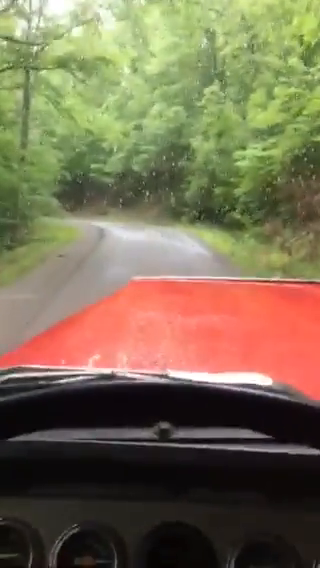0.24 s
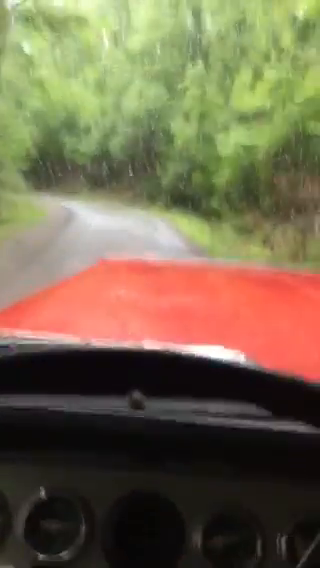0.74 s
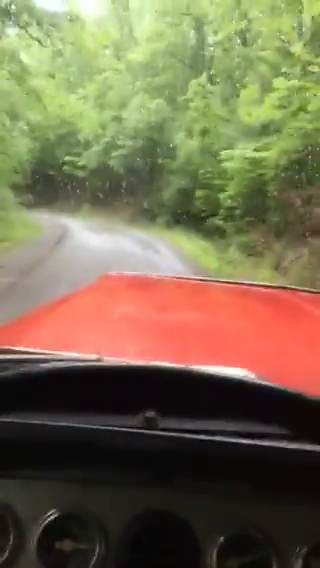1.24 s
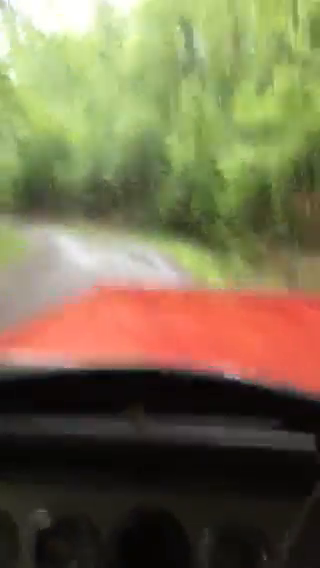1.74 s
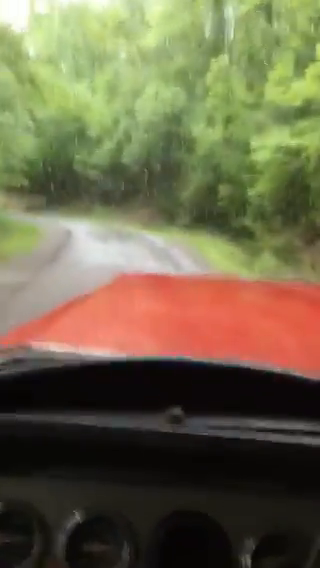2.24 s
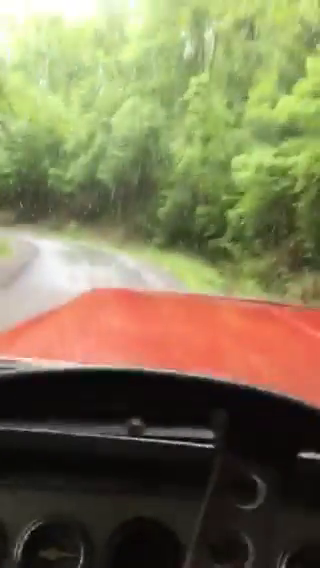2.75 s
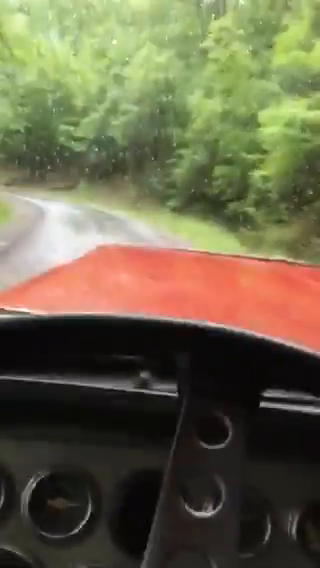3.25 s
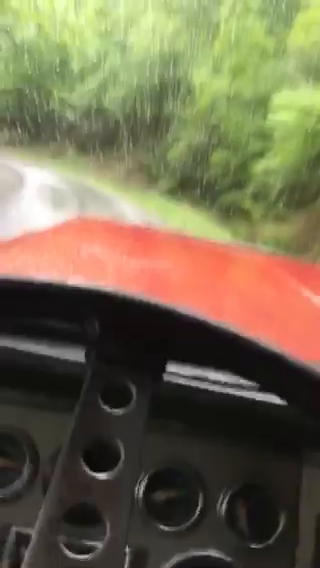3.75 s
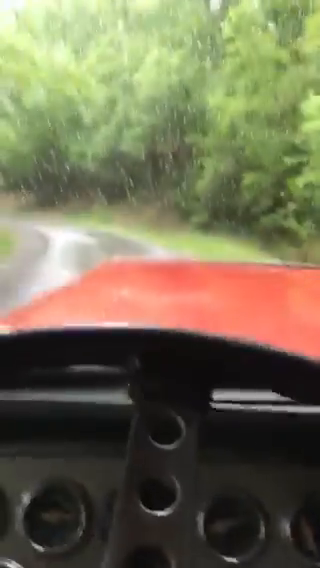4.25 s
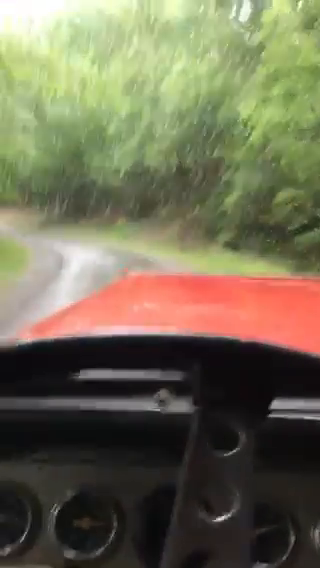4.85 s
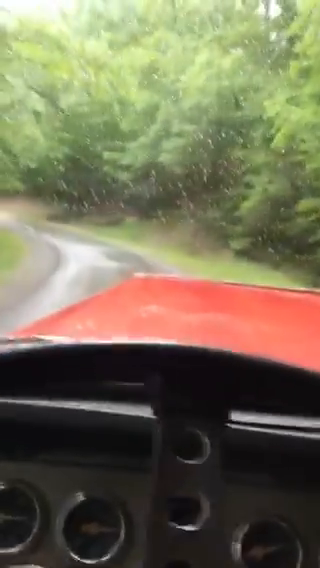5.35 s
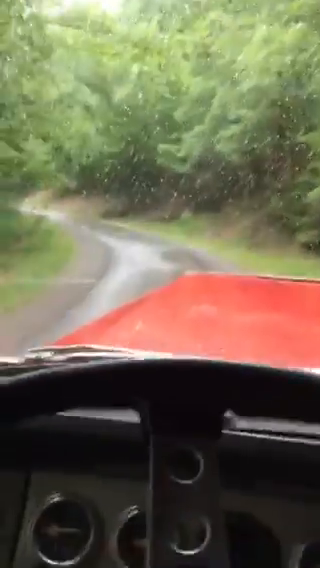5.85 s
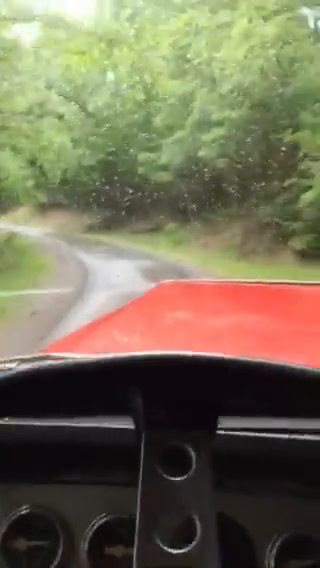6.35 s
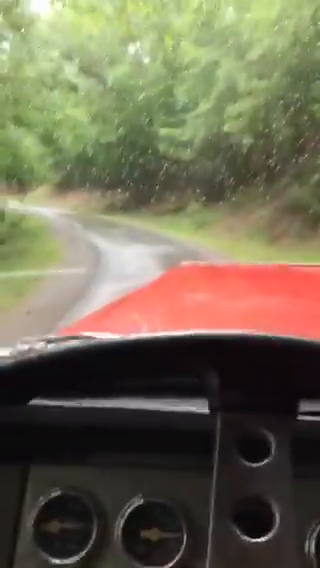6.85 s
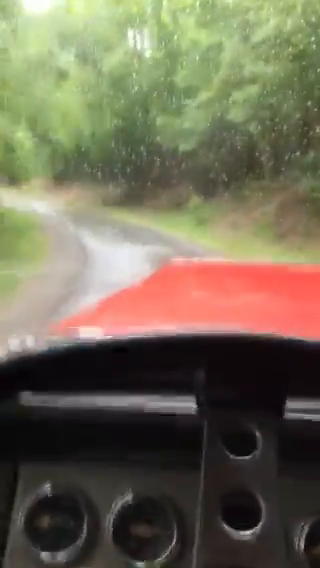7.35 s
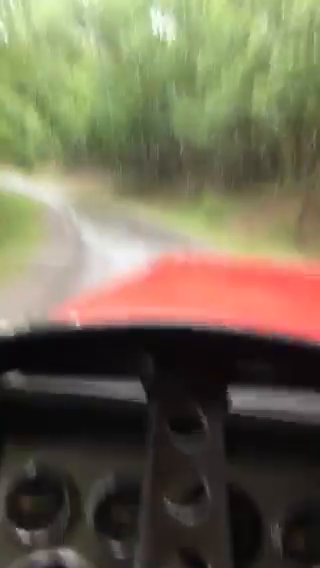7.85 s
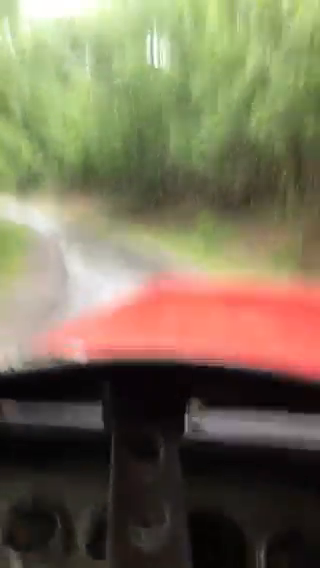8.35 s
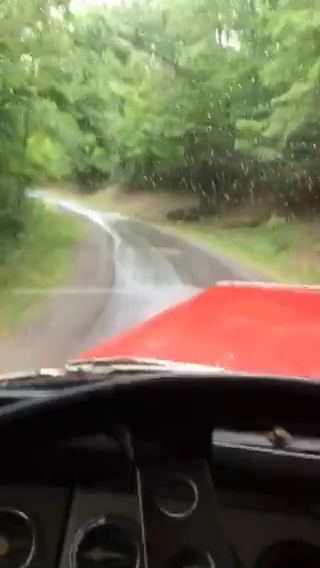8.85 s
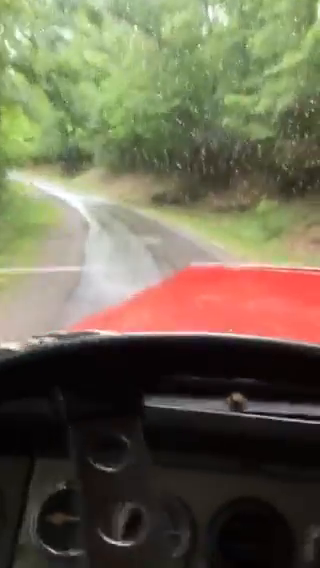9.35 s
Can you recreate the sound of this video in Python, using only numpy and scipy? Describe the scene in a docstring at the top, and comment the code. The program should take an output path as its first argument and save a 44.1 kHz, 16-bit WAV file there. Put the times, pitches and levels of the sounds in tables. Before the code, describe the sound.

A deep, even engine hum fills the cab of an old truck, close to the microphone, with the road rumbling up through the floor. The gears whine softly and creep up in pitch as the dash panels buzz lightly. A brief ringing tone comes and goes early on, and small metallic chinks and ticks appear in two loose clusters. Tyre spray hisses very faintly outside throughout.

```python
"""Cab of an old truck cruising along a wet country road, one microphone at the driver's seat.
Close up, the six-cylinder engine booms at its firing rate and the gears whine at their own shaft speed.
Road rumble comes up through the floor, engine clatter through the panels, tyre spray from outside.
Around the seat, narrow buzzes swell, a cab resonance rings briefly and loose parts chink and tick.
Far back, a turbocharger whistles faintly."""
import sys
import numpy as np
from scipy import signal
from scipy.fft import rfft, irfft
from scipy.io import wavfile

SR = 44100
rng = np.random.default_rng(int(sys.argv[2]) if len(sys.argv) > 2 else 0)


def generate_wav(sig):
    """Save sig (samples, or channels by samples) to the path in sys.argv[1] as 16-bit PCM at SR."""
    pcm = np.round(np.clip(np.atleast_2d(sig).T, -1, 1) * 32767).astype(np.int16)
    wavfile.write(sys.argv[1], SR, pcm)


N = 423360
T = np.arange(N) / SR
FREQ = np.maximum(np.arange(N // 2 + 1) * SR / N, 1)
CYLINDERS = 6


# engine speed as firing rate: t/s, f/Hz
FIRING_RATE = [(0.0, 91.23), (0.5, 92.1), (0.9, 90.81), (1.2, 91.98), (1.4, 90.79), (2.45, 90.67),
               (3.9, 89.33), (4.15, 89.01), (4.5, 89.6), (4.95, 89.12), (5.9, 90.66), (6.25, 90.3),
               (6.55, 91.33), (6.95, 91.87), (7.45, 93.53), (8.4, 93.45), (8.6, 92.5), (9.6, 93.4)]
# cab boom on the firing rate: t/s, level/dB
BOOM_LEVEL = [(0.0, -14.5), (0.4, -16.5), (0.65, -14), (0.95, -16.0), (2.25, -14), (2.5, -16.1),
              (3.3, -15.5), (4.35, -15.1), (5.75, -15.8), (5.9, -15.1), (7.3, -15.5), (7.4, -17.5),
              (7.75, -15), (8.45, -16.5), (8.7, -14.5), (9.6, -16)]
# weaker engine lines: multiple of the two-turn cycle, level/dB
CYCLE_ORDERS = [(2, -52), (3, -39.5), (4, -39), (10, -44.5), (13, -48), (14, -53.5), (18, -53.5), (20, -64),
                (22, -57), (28, -52), (29, -64), (34, -59), (38, -62), (44, -66.5), (56, -67), (64, -63.5),
                (80, -68), (112, -71.5), (288, -81)]
# peaks and dips from engine to microphone: f/Hz, width/Hz, lift/dB
ENGINE_TO_SEAT = [(183.36, 4, -19), (1450, 11, 7.5), (1501, 21, 8)]
# belt-driven accessories: level/dB, roughness/0-1, then their bracket's f/Hz, width/Hz, lift/dB
BELT_ACCESSORIES = [(-65, .12, 848, 25, 16.5), (-62, 0.2, 837, 12, 10)]

def engine(firing, firing_hz):
    """Just ahead of the seat: firings boom in the cab; unequal cylinders add multiples of the cycle."""
    def at_seat(ratio, db, path, rough, rate):
        return undb(db + lift_db(ratio * firing_hz, path)) * tone(ratio * firing, rough, rate)

    out = undb(curve(BOOM_LEVEL)) * tone(firing, rough=0.013, rate=10)
    out += at_seat(ratio=2, db=-36, path=ENGINE_TO_SEAT, rough=0.24, rate=7.5)
    for multiple, db in CYCLE_ORDERS:
        phase = multiple * firing / CYLINDERS + rng.uniform(0, 2 * np.pi)
        out += undb(db) * tone(phase, rough=0.19, rate=2.4)
    out += at_seat(ratio=16, db=-65, path=ENGINE_TO_SEAT, rough=0.42, rate=22)  # a pump or gear
    pulley_ratios = (9.52, 9.12)  # to the firing rate
    for ratio, (db, rough, *bracket) in zip(pulley_ratios, BELT_ACCESSORIES):
        out += at_seat(ratio, db, [bracket], rough, rate=5.5)
    return out


# driveline speed as tooth mesh rate: t/s, f/Hz
MESH_RATE = [(0.0, 221.7), (1.0, 221.6), (1.85, 229.2), (2.8, 236), (5.35, 239.2), (5.9, 240.7),
             (6.15, 241.9), (7.05, 246.2), (7.45, 248.9), (8.45, 249.4), (8.7, 247.6), (9.05, 248.9),
             (9.6, 249)]
# whine from the load on the teeth: t/s, lift/dB
TOOTH_LOAD = [(0, -0.5), (1.45, 1), (2.0, -1.5), (3, 1.5), (3.9, -1), (5.8, 0.5), (8.2, 0.5), (9.3, -2)]
# mesh harmonics, first to fourth: level/dB, roughness/0-1
WHINE_HARMONICS = [(-52, .2), (-47.5, .3), (-48, 0.25), (-56, 0.6)]
# peaks and dips from gearbox to microphone: f/Hz, width/Hz, lift/dB
GEARBOX_TO_SEAT = [(221, 3.6, 5), (250.4, 5.1, 11), (460, 24, -8.5), (496, 26, 3.5), (689.5, 15, -13),
                   (711, 18, 2.5), (734.5, 9, -12.5), (893, 25, 5.5), (922, 16, -9), (975, 10, -7)]

def gears():
    """Meshing teeth whine, swelling with the load and gliding across the cab's peaks and dips."""
    mesh_hz, load_db = curve(MESH_RATE), curve(TOOTH_LOAD)
    mesh = turns(mesh_hz)
    out = np.zeros(N)
    for k, (db, rough) in enumerate(WHINE_HARMONICS, 1):
        path_db = lift_db(k * mesh_hz, GEARBOX_TO_SEAT)
        out += undb(db + load_db + path_db) * tone(k * mesh, rough, rate=6)
    return out


# roughness of the road, as rumble in the 120-170 Hz band: t/s, level/dB
RUMBLE_LEVEL = [(0, -37), (.9, -40.5), (2.1, -39), (2.6, -41), (3.4, -39.5), (5.8, -39), (6.3, -41),
                (7.4, -38.5), (7.9, -41), (9.6, -40.5)]
# rumble spectrum at the seat: f/Hz, relative level/dB
RUMBLE_SPECTRUM = [(20, -74), (28, -58), (38, -51.5), (55, -53), (70, -48.5), (120, -48.5), (155, -53),
                   (200, -57.5), (250, -65.5), (310, -69), (380, -71), (600, -100), (2000, -160)]

def road_rumble():
    """Tyres and chassis shake the cab floor below the microphone."""
    shaking = rng.standard_normal(N) * undb(0.8 * walk(11))
    return undb(curve(RUMBLE_LEVEL)) * band_unit(colour(shaking, RUMBLE_SPECTRUM), 120, 170)


# clatter in the 1-4 kHz band: t/s, level/dB
CLATTER_LEVEL = [(0.0, -48), (1.0, -49), (1.15, -47.5), (2.5, -50), (3.15, -49), (4.9, -49), (6.5, -48),
                 (7.5, -47), (9.6, -47.5)]
# hardness of the combustion, heard in the treble: t/s, lift/dB
COMBUSTION_HARDNESS = [(0, 2), (1.2, 1.3), (2.2, 0.5), (5, -1), (8, 0.5), (9.6, -.5)]
# clatter spectrum at the seat: f/Hz, relative level/dB
CLATTER_SPECTRUM = [(300, -102), (380, -80), (470, -68), (600, -75), (780, -71.5), (930, -75), (1080, -79),
                    (1600, -79.5), (2450, -85.5), (2900, -90), (3500, -92), (4400, -99), (4900, -104),
                    (6500, -125)]
# firewall and dash resonances: f/Hz, width/Hz, lift/dB
FIREWALL_MODES = [(410, 30, 0), (966, 22, 5), (1224, 39, 2.5), (1310, 40, 5.5), (1458, 59, 5),
                  (1683, 36, 6), (2200, 70, 2.5), (2450, 110, 3.5), (4370, 130, 1.5)]

def clatter(firing):
    """Combustion and valve noise from behind the firewall, pulsing with each firing and each cycle."""
    pulsing = 1 + 0.046 * np.cos(firing) + 0.077 * np.cos(firing / CYLINDERS)
    combustion = rng.standard_normal(N) * pulsing * undb(0.5 * walk(9.9))
    treble = colour(combustion, [(1800, -40), (2500, -0.5)])
    combustion += (undb(curve(COMBUSTION_HARDNESS)) - 1) * treble
    in_cab = colour(combustion, CLATTER_SPECTRUM, FIREWALL_MODES)
    return undb(curve(CLATTER_LEVEL)) * band_unit(in_cab, 1000, 4000)


# narrow buzzes: f/Hz, width/Hz, resting level/dB, firing rate where loudest/Hz, span/Hz, lift/dB
BUZZ_BANDS = [(1720, 60, -71, 93.4, 1.5, 13), (2040, 41, -63.5, 91.4, 1.2, 5.5),
              (3250, 61, -75, 89.4, 3.3, 8.5)]

def buzzes(firing_hz):
    """A buzzing whine near 1720 Hz swells as the truck speeds up.
    Above it, two dash panels at arm's length each buzz most near one engine speed."""
    return sum(undb(db + lift_db(firing_hz, [swell])) * airy(2 * np.pi * hz * T, width)
               for hz, width, db, *swell in BUZZ_BANDS)


# brief swells of a whine in the cab: t/s, length/s, level/dB
WHINE_SWELLS = [(.26, 0.11, -52), (.55, 0.15, -52), (1.056, .35, -49), (1.75, 0.099, -53),
                (8.73, 0.12, -53)]

def cab_resonance(pitch_hz=1480, edge_s=0.033):
    """Around the microphone, a cab resonance rings with the engine: quick rise, hold, quick fall."""
    envelope = sum(undb(db) * np.clip(np.minimum(T - start, start + length - T) / edge_s, 0, 1)
                   for start, length, db in WHINE_SWELLS)
    return envelope * tone(2 * np.pi * pitch_hz * T, rough=0.14, rate=15)


# chinks of a loose metal part: t/s, level/dB
CHINK_KNOCKS = [(1.258, -56), (1.4713, -52), (1.9137, -58), (2.611, -56), (2.962, -55), (3.2146, -57.5),
                (7.2534, -59), (7.3375, -56.5), (7.5148, -53.5)]
# its ring: f/Hz, width/Hz, relative level/dB
CHINK_RING = [(5370, 260, -2), (5678, 240, -0.5), (6300, 370, -7.5)]
# thin bright ticks: t/s, level/dB
TICK_KNOCKS = [(0.4468, -53.5), (0.8604, -60), (1.365, -60), (1.479, -56), (1.7564, -60), (1.93, -54.5),
               (2.9703, -59), (3.1467, -61), (3.2131, -60), (3.2255, -64), (7.7937, -57.5)]
# their ring: f/Hz, width/Hz, relative level/dB
TICK_RING = [(11800, 2600, -2.5), (13100, 1800, 5.5), (14900, 1800, 0.5)]

def rattle(knocks, modes, decay_s, attack_s):
    """A small loose part in the cab: each knock is a short buzz of tiny contacts that rings its modes."""
    envelope = np.zeros(N)
    for start, db in knocks:
        age = np.maximum(T - start + attack_s / 2, 0)
        envelope += undb(db) * (1 - np.exp(-age / attack_s)) * np.exp(-np.minimum(age / decay_s, 20))
    contacts = envelope * rng.standard_normal(N)
    ring = sum(undb(db) / (1 + 2j * (FREQ - hz) / width) ** 2 for hz, width, db in modes)
    return irfft(rfft(contacts) * unit(ring), N)


# spray and air in the 6.5-7.7 kHz band: t/s, level/dB
SPRAY_LEVEL = [(0, -73), (1, -74), (2.6, -77), (3.3, -76), (5.2, -76.5), (7.6, -74), (9.6, -75)]
# their spectrum at the seat: f/Hz, relative level/dB
SPRAY_SPECTRUM = [(3500, -125), (5000, -107), (5600, -102), (6800, -105), (7600, -109), (9700, -108),
                  (10400, -114), (10900, -110), (12500, -110), (15700, -112)]

def spray():
    """Tyre spray and air hiss along the outside of the cab."""
    rush = rng.standard_normal(N) * undb(0.3 * walk(18))
    return undb(curve(SPRAY_LEVEL)) * band_unit(colour(rush, SPRAY_SPECTRUM), 6500, 7700)


# turbocharger speed as blade tone: t/s, f/Hz
BLADE_RATE = [(0, 4540), (1.2, 4466), (2.4, 4430), (3.4, 4335), (4.1, 4390), (4.9, 4310), (5.9, 4476),
              (7.5, 4510), (8, 4346), (8.7, 4016), (9.1, 3975), (9.6, 4100)]

def turbo(db_per_octave=32, waver_db=1.6):
    """Far back, a breathy whistle at two and three times the blade tone, louder as it spins up."""
    blade_hz = curve(BLADE_RATE)
    spin_db = db_per_octave * np.log2(blade_hz / blade_hz.mean()) + waver_db * walk(2.2)
    second = undb(-76 + spin_db) * airy(turns(2 * blade_hz), width_hz=190)
    third = undb(-74.7 + spin_db) * airy(turns(3 * blade_hz), width_hz=300)
    return second + third


def undb(db):
    """Decibels to gain."""
    return 10 ** (np.asarray(db) / 20)


def unit(x):
    """Scale to rms 1."""
    return x / np.sqrt(np.mean(np.abs(x) ** 2))


def band_unit(x, low_hz, high_hz):
    """Scale so that the part inside a band has rms 1."""
    inside = (FREQ > low_hz) & (FREQ < high_hz)
    return x / np.std(irfft(rfft(x) * inside, N))


def curve(table):
    """Rows of (t/s, value) joined by straight lines."""
    return np.interp(T, *np.transpose(table))


def turns(hz):
    """Phase in radians of something that turns at a moving rate."""
    return 2 * np.pi * np.cumsum(hz) / SR + rng.uniform(0, 2 * np.pi)


def walk(rate):
    """Smooth random motion of spread 1, up to about `rate` changes a second."""
    return unit(irfft(rfft(rng.standard_normal(N)) / (1 + (FREQ / rate) ** 2), N))


def tone(phase, rough, rate):
    """A line of rms near 1 whose size and phase tremble by the share `rough`."""
    return np.sqrt(2) * ((1 + rough * walk(rate)) * np.sin(phase) + rough * walk(rate) * np.cos(phase))


def airy(phase, width_hz):
    """A narrow band of noise of rms 1 around a pitch."""
    return unit(walk(width_hz) * np.sin(phase) + walk(width_hz) * np.cos(phase))


def lift_db(hz, resonances):
    """Lift in dB that a row of peaks and dips gives at a pitch."""
    return sum(lift / (1 + (2 * (hz - centre) / width) ** 2) for centre, width, lift in resonances)


def colour(x, spectrum, resonances=()):
    """Shape a sound by a spectrum (f/Hz, level/dB) with resonant bumps on it."""
    hz, db = np.transpose(spectrum)
    shape_db = np.interp(np.log(FREQ), np.log(hz), db) + lift_db(FREQ, resonances)
    return irfft(rfft(x) * undb(shape_db), N)


def scene():
    """Everything as it reaches the driver's seat, in mono."""
    firing_hz = curve(FIRING_RATE)
    firing = turns(firing_hz)
    drone = engine(firing, firing_hz) + gears() + buzzes(firing_hz) + turbo()
    roar = road_rumble() + clatter(firing) + spray()
    chinks = rattle(CHINK_KNOCKS, CHINK_RING, decay_s=0.012, attack_s=0.003)
    ticks = rattle(TICK_KNOCKS, TICK_RING, decay_s=0.015, attack_s=0.0015)
    return (drone + roar + cab_resonance() + chinks + ticks)[None]


def record(dry):
    """A phone microphone that cuts off above 15.6 kHz; both ends fade over 8 ms."""
    fades = np.clip(np.minimum(T, T[-1] - T) / 0.008, 0, 1)
    top_cut = signal.ellip(10, 0.1, 80, 15600, fs=SR, output="sos")
    return signal.sosfilt(top_cut, dry * fades)


dry = scene()
out = record(dry)
generate_wav(out)
```